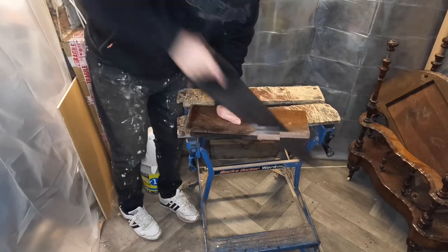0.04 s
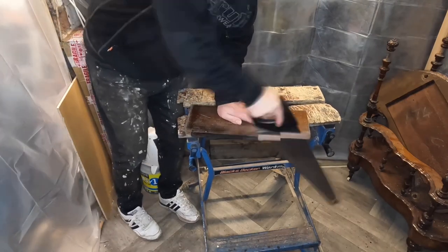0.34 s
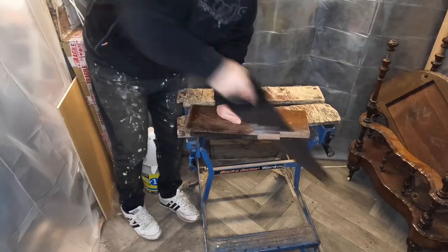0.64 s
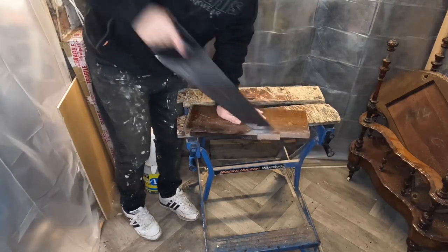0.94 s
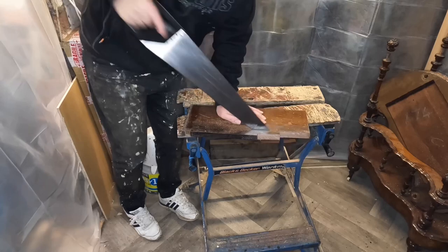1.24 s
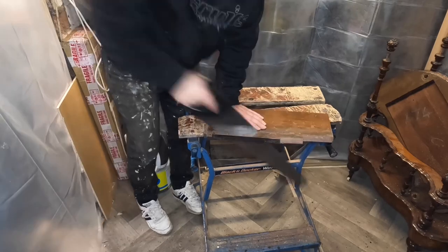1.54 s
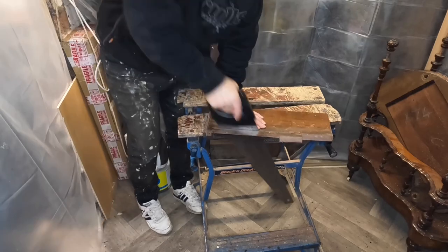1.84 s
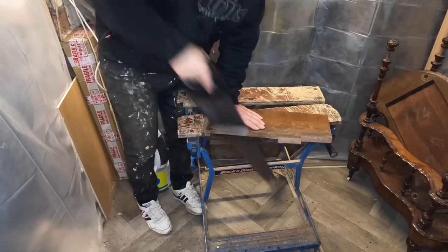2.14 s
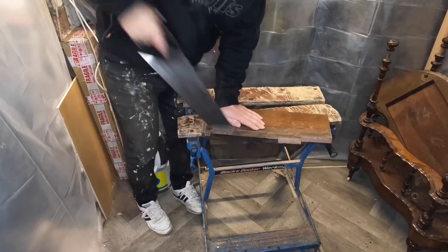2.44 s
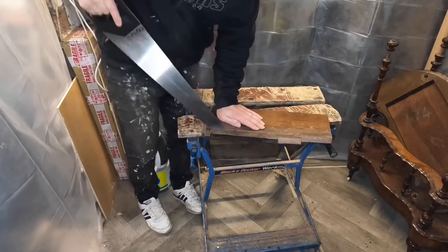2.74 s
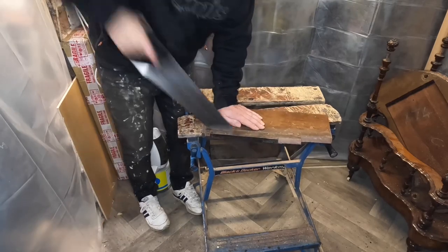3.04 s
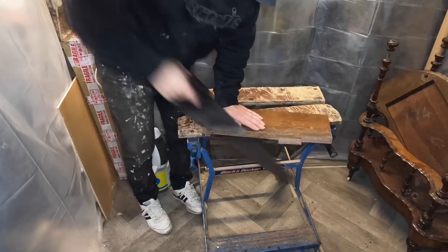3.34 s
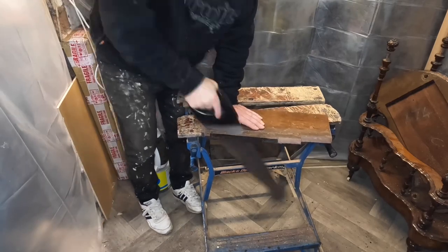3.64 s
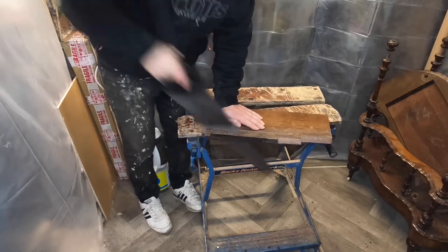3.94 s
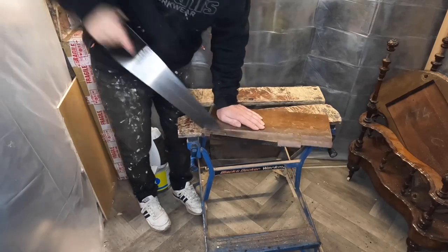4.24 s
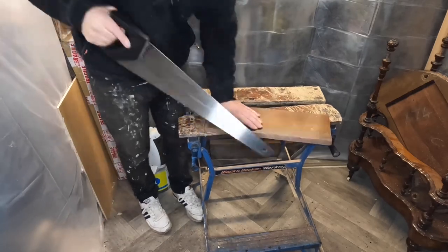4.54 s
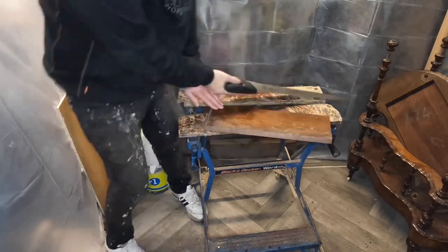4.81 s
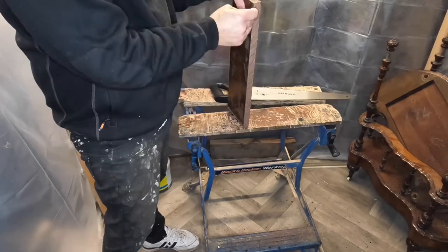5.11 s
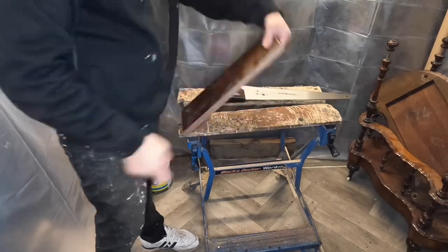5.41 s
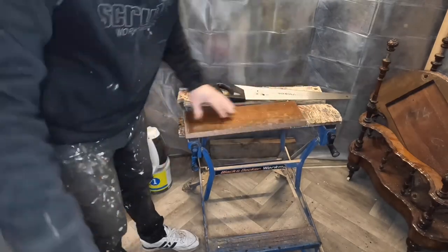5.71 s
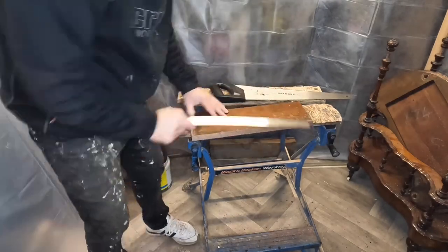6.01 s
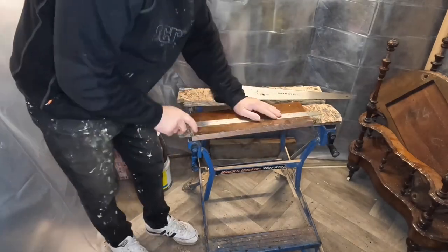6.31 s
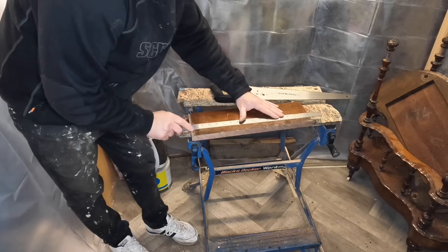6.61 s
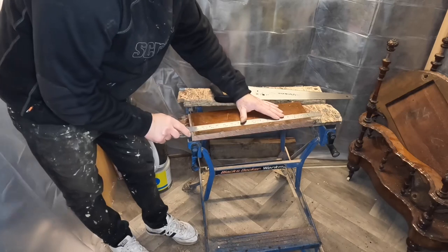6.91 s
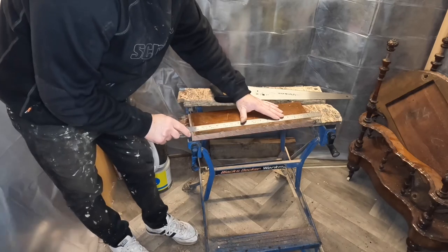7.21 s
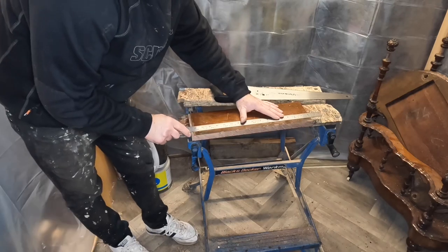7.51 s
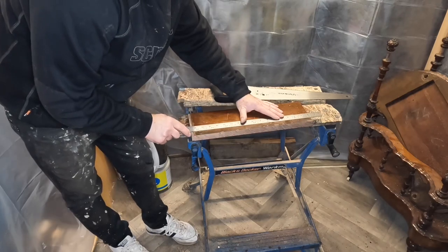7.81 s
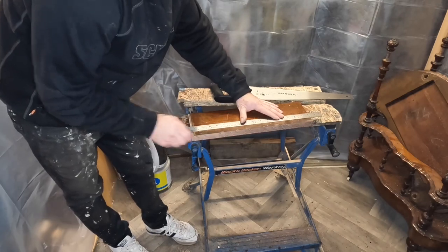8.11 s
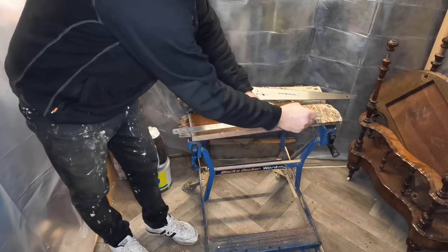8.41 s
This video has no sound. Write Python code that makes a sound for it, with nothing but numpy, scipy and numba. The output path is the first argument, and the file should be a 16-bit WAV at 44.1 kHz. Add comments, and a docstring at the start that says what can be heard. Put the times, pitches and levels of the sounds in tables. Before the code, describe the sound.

Quick, steady hand sawing in a small workshop ends with a steel clatter, knocks of handled wood and faint taps.

```python
"""A hand saw cuts a board on a folding workbench in a small workshop, about four pushes and pulls a second.
Its teeth tear wood fibres, which makes the board, the steel blade and the bench ring. At 4.5 s the saw
breaks through, clatters and slides onto the bench. From 5.4 s the board is turned over and dropped, with
hands and sleeves brushing it. Just after 6 s a thin strip of wood is clapped against its edge.
A few light taps follow, over the low rumble of the room."""
import sys
import numpy as np
from scipy import signal
from scipy.fft import rfft, irfft
from scipy.io import wavfile
from scipy.ndimage import uniform_filter1d
from numba import njit

SR = 44100
rng = np.random.default_rng(int(sys.argv[2]) if len(sys.argv) > 2 else 0)


def int16_out(signal):
    """Quantize to a 16-bit WAV file."""
    q = np.round(np.clip(np.atleast_2d(signal).T, -1, 1) * 32767)
    wavfile.write(sys.argv[1], SR, q.astype(np.int16))


N = 377496
TIME = np.arange(N) / SR
FREQ = np.maximum(np.arange(N // 2 + 1) * SR / N, 1)
NEAR_END_S, CUT_END_S = 1.42, 4.505  # the saw moves to the board's near end; it breaks through

# The saw's to and fro: (pull start [s], push start [s], pull rasp [dB], bench shake on the pull [dB])
STROKES = [(-0.07, 0.055, -25.5, -27), (0.173, 0.305, -26.5, -29.5), (0.427, 0.557, -28, -27),
           (0.669, 0.799, -26, -30.5), (0.923, 1.044, -26, -35), (1.166, 1.293, -26.5, -38.5),
           (1.417, 1.522, -28.5, -37.5), (1.638, 1.77, -27, -31.5), (1.937, 2.045, -21, -26),
           (2.156, 2.309, -26, -25.5), (2.441, 2.555, -27, -34), (2.676, 2.81, -29, -40),
           (2.932, 3.061, -26.5, -42.5), (3.192, 3.322, -26.5, -32.5), (3.458, 3.587, -24, -31.5),
           (3.705, 3.836, -27, -32), (3.962, 4.093, -26, -42), (4.225, 4.348, -24.5, -42)]
def saw(top_teeth_per_s=340):
    """Teeth tear through the wood, louder as the blade speeds up, and shake blade, board and bench."""
    strokes = np.array(STROKES)
    turns = strokes[:, :2].ravel()  # times at which the saw changes direction
    rasp_gain, grind_gain, ring_gain, shake_gain = stroke_gains(turns, strokes[:, 2:])
    place, speed = arm_motion(turns)
    teeth_passed = np.cumsum(top_teeth_per_s * speed ** .7 * (1 + .035 * wander(70))) / SR
    # each tooth strikes the edge of the cut once, then tears
    strikes = np.diff(np.floor(teeth_passed), prepend=0) * undb(5.5 * wander(400))
    strikes = strikes / np.std(strikes[TIME < CUT_END_S])
    # uneven grain makes the blade catch and jump
    grip = (1 + 0.13 * np.cos(2 * np.pi * teeth_passed)) * undb(wander(170))
    rasp = rasp_gain * tooth_rasp(grip, place, turns)
    ring = ring_gain * board_ring(grip, strikes) * (0.24 + 0.82 * speed ** 2.2)
    grind = grind_gain * low_grind(grip, strikes)
    shake = shake_gain * bench_shake() * (0.9 + 0.34 * speed)
    effort = 0.08 + 0.92 * speed ** 1.25
    cutting = np.clip((CUT_END_S + 0.0355 - TIME) / .03, 0, 1)
    return cutting * (effort * (rasp + grind) + ring + shake)


def stroke_gains(turns, pull_levels, push_rasp_db=-23.5, push_shake_db=-36.5, grind_fade_db_per_s=1.8):
    """Strength of each layer over time: pushes cut and ring the board, pulls drag and shake the bench."""
    push = np.arange(len(turns)) % 2 == 1
    pull_rasp_db, pull_shake_db = np.repeat(pull_levels, 2, axis=0).T
    rasp_db = np.where(push, push_rasp_db, pull_rasp_db)
    push_ring_db = np.where(turns < NEAR_END_S, -17, -2.7)  # the near end rings more
    ring_db = rasp_db + np.where(push, push_ring_db, -14)
    rasp_db[-1] += 2  # the last push is harder
    grind_db = rasp_db + np.where(push, -4, -9.5) - grind_fade_db_per_s * turns
    shake_db = np.where(push, push_shake_db, pull_shake_db)
    stroke = np.clip(np.searchsorted(turns, TIME) - 1, 0, len(turns) - 1)
    return [uniform_filter1d(undb(db)[stroke], size=900) for db in (rasp_db, grind_db, ring_db, shake_db)]


def arm_motion(turns):
    """Where the blade is (-1 to 1) and how fast it moves (0 to 1); it stops at every turn."""
    peak_share = np.resize([.61, .53], len(turns))  # how far into a pull, a push it is fastest
    fastest = turns + np.diff(np.r_[turns, CUT_END_S]) * peak_share
    marks = np.sort(np.r_[turns, fastest, CUT_END_S])
    angle = np.interp(TIME, marks, np.arange(len(marks))) * np.pi / 2
    return -np.cos(angle), np.abs(np.sin(angle))


# The bright tone of tearing wood: (frequency [Hz], level [dB])
RASP_TONE = [(300, -33.5), (900, -12), (1300, -3), (2150, -2), (2600, 0.5), (3700, -2.5), (5500, 0),
             (6100, -4.5), (7600, -4.5), (9000, -8), (11500, -18), (16000, -27.5)]
def tooth_rasp(grip, place, turns):
    """Snapping fibres hiss and make the steel sing."""
    steel = singing_steel(grip * clicks(per_s=9000, spread_db=2), place, turns)
    tearing = filtered(grip * clicks(per_s=14000, spread_db=2), tone_curve(RASP_TONE))
    return undb(-5) * tearing + undb(-1.25) * steel


def singing_steel(drive, place, turns, count=44, step=64):
    """The blade's notes slide as its free length changes, and fade in and out as it moves in the cut."""
    out, place, time = 0, place[::step], TIME[::step]
    for k, (offset, phase, ripple, lean) in enumerate(rng.random((count, 4))):
        centre_hz = 800 + 14000 * ((k + offset) / count) ** 1.7
        # the wrist bends the blade a little differently on every stroke
        bend, twist = (np.interp(time, turns, rng.standard_normal(len(turns))) for _ in range(2))
        hz = centre_hz * (1 + 0.02 * (lean - .5) * place + .035 * bend)
        fading = np.cos(1.79 * (.5 + ripple) * place + 2 * np.pi * phase + twist) ** 2
        strength = tone_curve(RASP_TONE, centre_hz) * (centre_hz / 1000) ** 0.7
        width_hz = 51 * np.sqrt(centre_hz / 1000)  # the cut pinches the blade: high notes die sooner
        out = out + sliding_note(drive, hz, strength * fading, float(width_hz), step)
    return unit(out)


@njit
def sliding_note(drive, hz, gain, width_hz, step):
    """One note kept ringing by the drive; its pitch and strength are given once every step samples."""
    out, state = np.zeros(len(drive)), 0j
    for block in range(len(hz) - 1):
        spin_and_fade = np.exp((2j * np.pi * hz[block] - np.pi * width_hz) / SR)
        for k in range(step):
            i = block * step + k
            state = state * spin_and_fade + drive[i]
            out[i] = state.imag * (gain[block] + (gain[block + 1] - gain[block]) * k / step)
    return out


# The board's own notes; wider ones die sooner: (frequency [Hz], width [Hz], level [dB])
BOARD_NOTES = [(1273, 16, -5), (1466, 110, -2), (1745, 66, 2.5), (2410, 27, -5), (2690, 120, -7),
               (3072, 150, -7.5), (3250, 37, -4), (4020, 190, -11.5), (5800, 470, -14.5)]
def board_ring(grip, strikes):
    """Snapping fibres and striking teeth make the board ring."""
    return filtered(unit(grip * clicks(per_s=5900, spread_db=3)) + strikes, body(BOARD_NOTES))


# The deep tone of the cut: (frequency [Hz], level [dB])
GRIND_TONE = [(130, -20.5), (230, 1.5), (310, 1.5), (420, -2.5), (520, -10.5), (770, 3.5), (1000, -2.5),
              (1400, -5), (2500, -13.5), (6000, -20.5), (16000, -42)]
def low_grind(grip, strikes):
    """Coarse, uneven tearing mixed with the buzz of the teeth."""
    tearing = unit(grip * clicks(per_s=2800, spread_db=6.5))
    return filtered(tearing + undb(-2) * strikes, tone_curve(GRIND_TONE))


# The bench's own low notes: (frequency [Hz], width [Hz], level [dB])
BENCH_NOTES = [(64.3, 24, -10), (119, 18, 0.5), (145.7, 17, 3), (249.6, 25, -10.5), (301, 14, -13)]
def bench_shake():
    """Sawing shakes the bench; a firm hold on the board keeps the shaking from building up."""
    shake = filtered(clicks(per_s=600, spread_db=0), body(BENCH_NOTES) / (1 + (FREQ / 420) ** 4))
    return shake / np.sqrt(uniform_filter1d(shake ** 2, size=3000) + 0.31)


# The teeth catch: (time [s], decay [s], level [dB], brightness [dB per octave], bench thump [dB])
SNAGS = [(0.398, 0.023, -14, -2.5, -20.5), (0.765, 0.0062, -21, -0.5, -20),
         (1.883, 0.0094, -19.5, -2.5, -19), (2.179, 0.01, -21, -4.5, -31), (2.236, 0.008, -40, -11, -28.5),
         (3.548, 0.012, -22.5, -1.5, -19.5), (3.781, 0.012, -19, 2.5, -29), (4.42, 0.0068, -21, 0, -13.5),
         (4.463, 0.017, -18.5, 1.5, -28)]
def saw_snags():
    """Teeth catch in the cut with a sharp crack."""
    return sum(blow(s, 0.0014, decay, db, tilt_db=tilt, clack_hz=3300, clack_db=-8.5, bench_db=bench)
               for s, decay, db, tilt, bench in SNAGS)


# The freed saw bumps about: (time [s], level [dB], clack pitch [Hz], blade ring [dB])
CLATTERS = [(4.512, -24, 1507, -25.5), (4.544, -21, 1640, -19), (4.641, -29, 3480, -45),
            (4.718, -38.5, 3600, -52.5), (4.788, -32.5, 2690, -72), (4.851, -23.5, 1450, -38),
            (4.933, -18, 952, -65.5), (4.967, -26.5, 4440, -45)]
def saw_clatter():
    """The saw knocks against board and bench, and its blade rings."""
    return sum(blow(s, 0.0068, 0.015, db, tilt_db=0.47, clack_hz=hz, clack_db=-1.5,
                    bench_db=db - 6, blade_db=ring) for s, db, hz, ring in CLATTERS)


# The board is stood on end, dropped and settled:
# (time [s], rise [s], decay [s], level [dB], clack pitch [Hz], blade ring [dB])
BOARD_KNOCKS = [(5.424, 0.0031, 0.031, -30, 710, -44), (5.622, 0.0003, 0.014, -14, 2850, -26),
                (5.686, 0.0086, 0.016, -24, 1380, -44), (5.861, 0.0018, 0.011, -26.5, 330, -76)]
def board_knocks():
    """The heavy board thumps the bench and rings the saw lying beside it."""
    return sum(blow(s, rise, decay, db, tilt_db=0.4, clack_hz=hz, clack_db=-3,
                    bench_db=db - 2, blade_db=ring) for s, rise, decay, db, hz, ring in BOARD_KNOCKS)


# Soft thuds: (time [s], level [dB])
ROCKS = [(5.48, -25.5), (5.749, -21)]
def board_rocking():
    """The board rocks on the bench."""
    return sum(undb(db) * bench_thump(np.maximum(TIME - s, 0), rise_s=.025) for s, db in ROCKS)


# The strip meets the board: (time [s], level [dB], clack pitch [Hz])
CLAPS = [(6.171, -19, 2800), (6.257, -23.5, 3400)]
def strip_claps():
    """The light strip makes bright claps that hardly move the bench."""
    return sum(blow(s, 0.0045, 0.011, db, tilt_db=6.5, clack_hz=hz, clack_db=-1.5, bench_db=db - 16)
               for s, db, hz in CLAPS)


# Small touches: (time [s], level [dB])
TAPS = [(5.129, -38), (5.196, -55), (5.286, -51.5), (5.526, -47.5), (6.297, -37), (6.52, -59.5),
        (6.895, -69.5), (7.532, -61), (8.264, -63.5), (8.326, -59.5), (8.396, -54.5)]
def light_taps():
    """Fingers and strip tap the wood lightly."""
    return sum(blow(s, .005, 0.018, db, tilt_db=3, clack_hz=3000, clack_db=-3.5, bench_db=db - 10.5)
               for s, db in TAPS)


def blow(time_s, rise_s, decay_s, level_db, tilt_db, clack_hz, clack_db, bench_db, blade_db=None):
    """One hit at its place in time: it knocks the wood, thumps the bench and may ring the blade."""
    lead_s, size = .03, 16384
    t = np.arange(size) / SR - lead_s
    age = np.maximum(t, 0)
    sound = undb(level_db - 1) * wood_knock(t, rise_s, decay_s, tilt_db, clack_hz, clack_db)
    sound += undb(bench_db) * bench_thump(age, rise_s)
    if blade_db is not None:
        sound += undb(blade_db - 2) * np.minimum(age / (rise_s + .003), 1) * blade_ring(age)
    out, start = np.zeros(N + size), int((time_s - lead_s) * SR)
    out[start:start + size] = sound
    return out[:N]


# The tone of knocked wood: (frequency [Hz], level [dB])
WOOD_TONE = [(60, -4.5), (200, 7), (300, 9), (450, 1), (800, 2.5), (1500, -8), (3000, -2.5), (5000, -6),
             (8000, -5), (11000, -9.5), (16000, -20)]
def wood_knock(t, rise_s, decay_s, tilt_db, clack_hz, clack_db):
    """A rough contact builds up and dies away, ringing the board and adding a hollow clack."""
    freq = np.maximum(np.arange(len(t) // 2 + 1) * SR / len(t), 1)
    wood = tone_curve(WOOD_TONE, freq) * undb(tilt_db * np.log2(np.clip(freq, 400, 7000) / 1500))
    board = np.abs(sum(undb(db) * resonance(hz, width, freq) for hz, width, db in BOARD_NOTES))
    hollow = resonance(clack_hz, 260 * np.sqrt(clack_hz / 1000), freq) ** 2
    before, after = np.minimum(t - rise_s, 0), np.maximum(t - rise_s, 0)
    crack = filtered(rng.standard_normal(len(t)), wood * (1 + undb(5) * board))
    crack *= np.exp(-after / decay_s) + undb(-22) * np.exp(-after / 0.019)
    clack = filtered(rng.standard_normal(len(t)), hollow)
    clack *= undb(clack_db) * np.exp(-after / (0.85 * decay_s))
    return np.exp(before / (0.7 * rise_s)) * (crack + clack)


def bench_thump(age, rise_s, sway_db=-6):
    """The bench booms after a hit; a short hit hardly stirs the slow sway of its legs."""
    out = 0
    for hz, width, db in BENCH_NOTES:
        fade = np.exp(-np.pi * 0.92 * width * age)
        out = out + undb(db + sway_db * (hz < 100)) * fade * np.sin(2 * np.pi * hz * age)
    return out * np.minimum(age / (rise_s + .003), 1)


# The notes of the free blade: (frequency [Hz], level [dB], time to fade by 60 dB [s])
BLADE_NOTES = [(570, -13.5, .25), (1240, -8.5, 0.41), (1460, -6, 0.094), (1510, 4, 0.093),
               (1725, -4, 0.096), (1865, 3, .12), (2090, -10.5, 0.53), (2185, -9.5, .12), (2380, -14, 0.44),
               (2770, -15, .3), (3530, -12.5, .3), (4530, -11, 0.21), (4900, -5.5, 0.24), (5600, -10, 0.27)]
def blade_ring(age, waver=0.011, whip_hz=19):
    """The free blade rings; it whips to and fro, which makes every note wobble."""
    out = 0
    for (hz, db, fade_s), phase in zip(BLADE_NOTES, 2 * np.pi * rng.random(len(BLADE_NOTES))):
        whip = np.sin(2 * np.pi * whip_hz * age + phase)
        cycles = np.cumsum(hz * (1 + waver * whip)) / SR
        out = out + undb(db - 60 * age / fade_s) * (1 + .6 * whip) * np.sin(2 * np.pi * cycles)
    return out


# The saw's slides: (time [s], length [s], level [dB])
SLIDES = [(4.59, 0.15, -38), (4.89, 0.05, -32.5), (4.955, 0.1185, -16.5)]
# The tone of steel scraping wood: (frequency [Hz], level [dB])
SCRAPE_TONE = [(47, -38), (80, -21.5), (149, 5), (186, -13), (303, -12), (395, -28), (431, -22.5),
               (802, -9), (1780, -17), (3030, -13.5), (4520, -17.5), (7870, -14), (16000, -27.5)]
def saw_slides():
    """The saw scrapes out of the cut, then onto the bench, slowing to rest."""
    pressure = swell(SLIDES, attack_s=0.0053, fade_db_per_s=121.5, release_s=0.0033)
    return pressure * rubbing(SCRAPE_TONE, clicks_per_s=3500, jerk_db=1.5)


# Hand movements: (time [s], length [s], level [dB])
BRUSHES = [(5.465, 0.084, -53), (5.6, 0.13, -40), (5.82, 0.059, -49.5), (6.0, 0.022, -55.5),
           (6.36, 0.15, -61), (6.57, 0.2, -73)]
# The tone of cloth on wood: (frequency [Hz], level [dB])
CLOTH_TONE = [(100, -9.5), (400, -5), (1000, -17), (3000, -7.5), (6000, -14.5), (12000, -14), (16000, -22)]
def sleeve_brushes():
    """Hands and sleeves brush over the board."""
    pressure = swell(BRUSHES, attack_s=0.026, fade_db_per_s=84.5, release_s=0.02)
    return pressure * rubbing(CLOTH_TONE, clicks_per_s=8700, jerk_db=5.5)


def rubbing(tone, clicks_per_s, jerk_db):
    """One surface drags over another in small jerks."""
    return filtered(clicks(clicks_per_s, spread_db=0.5) * undb(jerk_db * wander(110)), tone_curve(tone))


def wall_echo(x, fade_s, level_db, dull_hz, size=16384):
    """Short echoes from close, cluttered walls, falling by 60 dB in fade_s."""
    t = np.arange(size) / SR
    echo = rng.standard_normal(size) * undb(-60 * t / fade_s) * (t > .002)
    echo = unit(signal.lfilter(*signal.butter(1, dull_hz, fs=SR), echo)) / np.sqrt(size)
    return undb(level_db) * signal.fftconvolve(x, echo)[:N]


# The moment the sound spreads out: (time [s], length [s], boost [dB])
WIDENING = [(5.62, 0.08, 14.5)]
def landing_spread(work):
    """A very short echo opens the sound to left and right as the board lands."""
    width = swell(WIDENING, attack_s=.003, fade_db_per_s=5, release_s=0.016)
    return width * wall_echo(work, fade_s=.015, level_db=-26.5, dull_hz=7000)


# Quiet gaps: (start [s], end [s])
DIPS = [(1.405, 1.433), (5.082, 5.125)]
def level_dips(depth_db=-19):
    """A gain that makes the level dip briefly, twice."""
    inside = sum(1. * (TIME > start) * (TIME < end) for start, end in DIPS)
    return undb(depth_db * uniform_filter1d(inside, size=700))


# The tone of the quiet room: (frequency [Hz], level [dB])
RUMBLE_TONE = [(13, -49.5), (22, -17), (64, -1), (97, -11.5), (165, -25.5), (229, -26), (294, -34.5),
               (328, -34.5), (554, -32.5), (690, -42.5), (1860, -48.5), (3610, -40.5), (4630, -50),
               (12100, -51), (16000, -56)]
def room_rumble(level_db=-50):
    """The room's low, steady rumble."""
    return undb(level_db) * filtered(rng.standard_normal(N), tone_curve(RUMBLE_TONE))


def clicks(per_s, spread_db):
    """Many tiny clicks of unequal size, like wood fibres snapping."""
    hit = rng.random(N) < per_s / SR
    return hit * rng.choice([-1, 1], N) * undb(spread_db * np.clip(rng.standard_normal(N), -3, 2.5))


def wander(steps_per_s):
    """A value that drifts at random, mostly between -1 and 1."""
    steps = np.clip(rng.standard_normal(N // 20), -2.3, 2.3)
    return 1.2 * np.interp(TIME * steps_per_s, np.arange(len(steps)), steps)


def swell(rows, attack_s, fade_db_per_s, release_s):
    """A gain that builds up to each row's time, fades over its length, then lets go."""
    gain = 0
    for s, length, db in rows:
        age = TIME - s
        edges = np.exp(np.minimum(age, 0) / attack_s - np.maximum(age - length, 0) / release_s)
        gain = gain + undb(db - fade_db_per_s * np.clip(age, 0, length)) * edges
    return gain


def tone_curve(points, freq=FREQ):
    """A filter drawn through (frequency [Hz], level [dB]) points."""
    hz, db = np.transpose(points)
    return undb(np.interp(np.log(freq), np.log(hz), db))


def resonance(hz, width_hz, freq=FREQ):
    """A filter that rings at one note, with gain 1 at its centre."""
    return 1 / (1 + 1j * (freq ** 2 - hz ** 2) / (freq * width_hz))


def body(notes):
    """The filter of an object that rings at several notes."""
    return sum((-1) ** k * undb(db) * resonance(hz, width) for k, (hz, width, db) in enumerate(notes))


def filtered(x, response):
    """Filter a sound and bring it to average power 1."""
    return unit(irfft(rfft(x) * response, len(x)))


def unit(x):
    """Scale a sound to average power 1."""
    return x / np.sqrt(np.mean(x ** 2) + 1e-18)


def undb(db):
    """Turn decibels into a gain to multiply by."""
    return 10 ** (np.asarray(db) / 20)


def scene():
    """The work at the bench is heard straight ahead, over the room's rumble."""
    work = saw() + saw_snags() + saw_clatter() + board_knocks() + board_rocking()
    work += strip_claps() + light_taps() + saw_slides() + sleeve_brushes()
    rumble, side_rumble = room_rumble(), room_rumble()
    echo = wall_echo(work, fade_s=0.23, level_db=-17, dull_hz=4500)
    middle = level_dips() * (work + echo) + rumble
    side = landing_spread(work) + undb(-11.5) * side_rumble
    side = irfft(rfft(side) * resonance(2800, 7000), N)  # keeps the bass in the middle
    return np.array([middle + side, middle - side])


def record(dry):
    """Cut off the highest treble, above 15850 Hz."""
    return signal.sosfilt(signal.ellip(10, .2, 75, 15850, fs=SR, output="sos"), dry)


dry = scene()
out = record(dry)
int16_out(out)
```